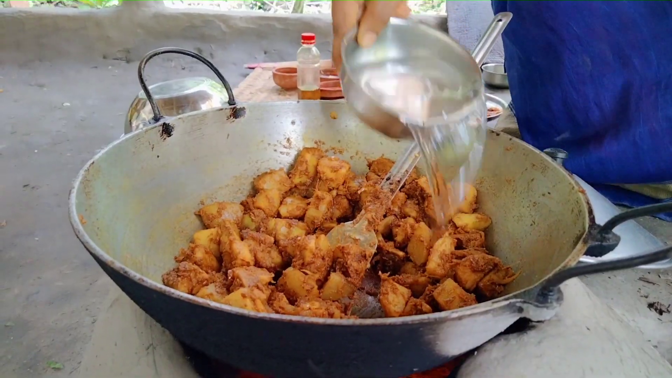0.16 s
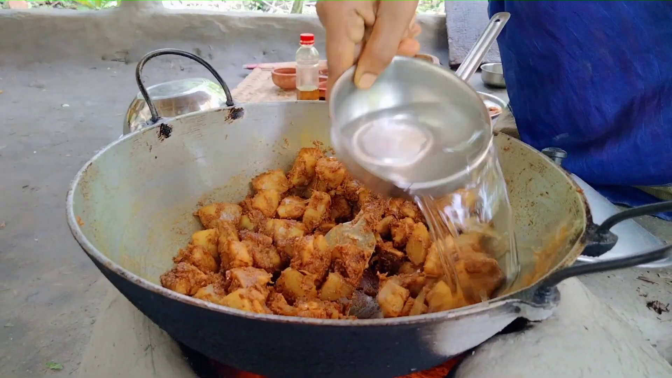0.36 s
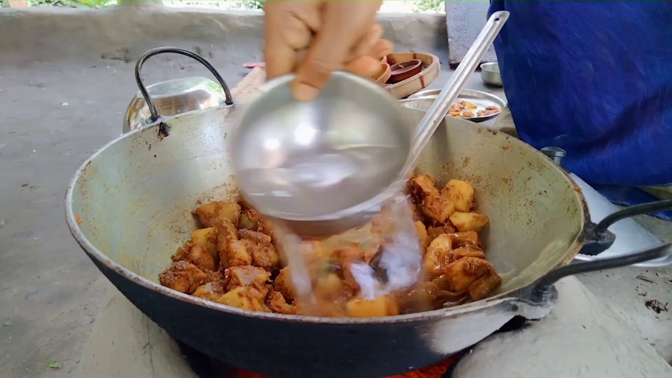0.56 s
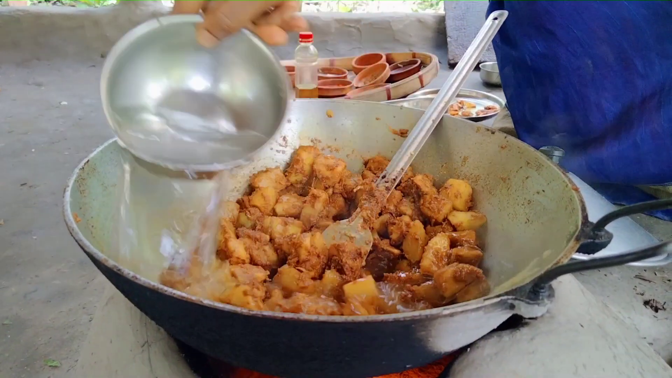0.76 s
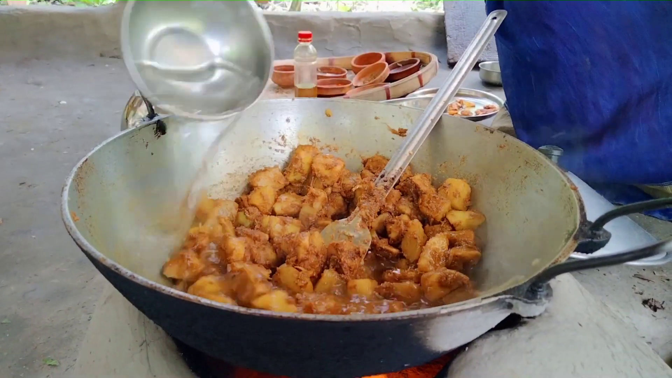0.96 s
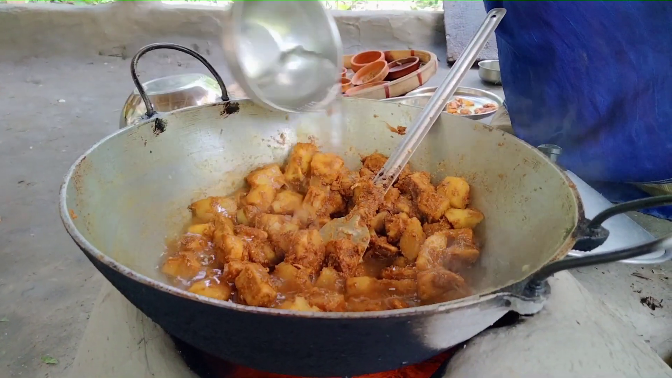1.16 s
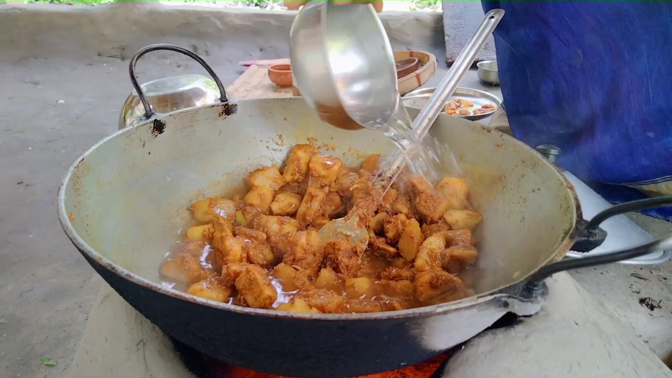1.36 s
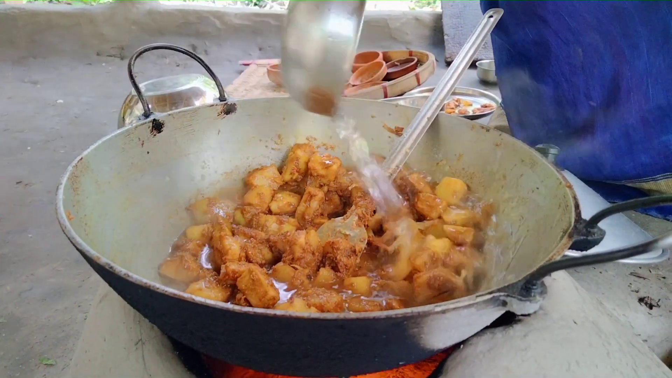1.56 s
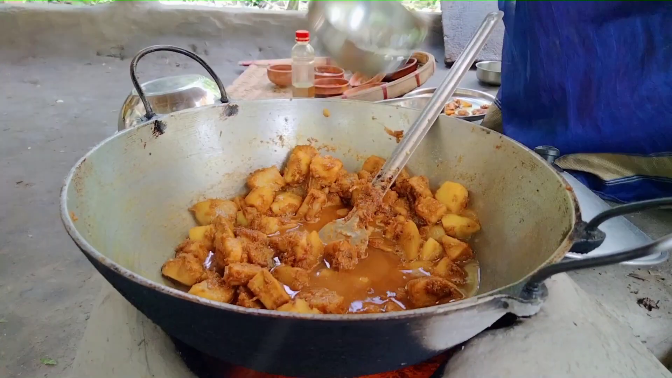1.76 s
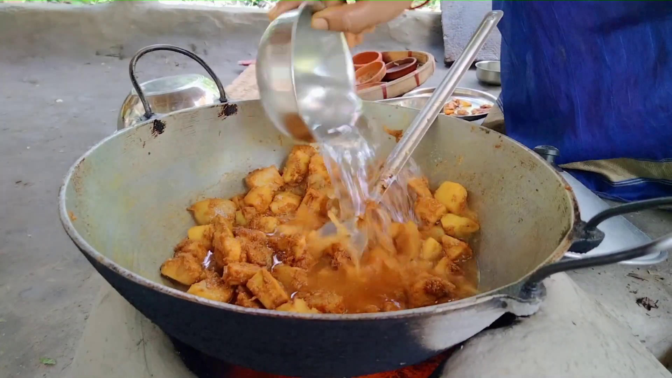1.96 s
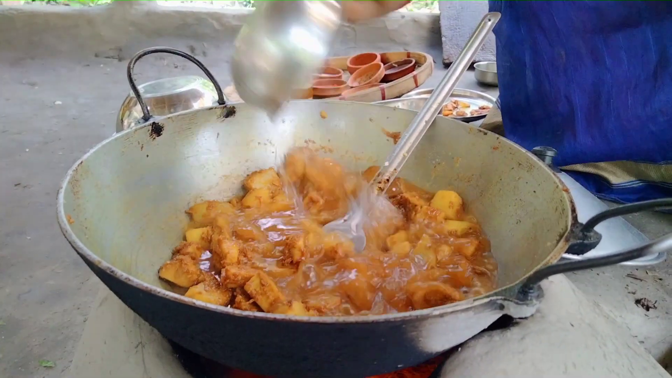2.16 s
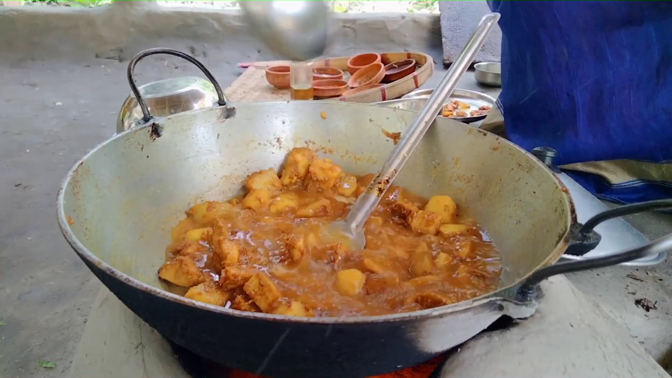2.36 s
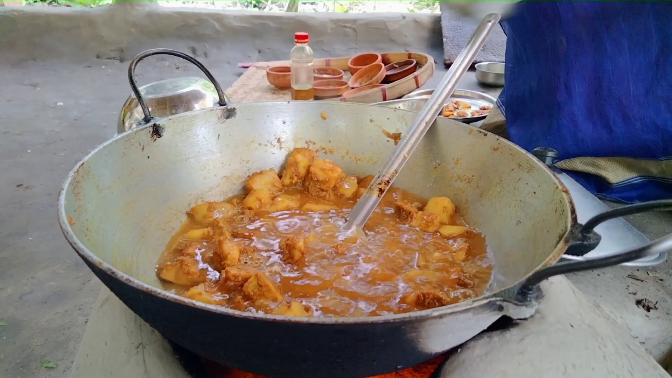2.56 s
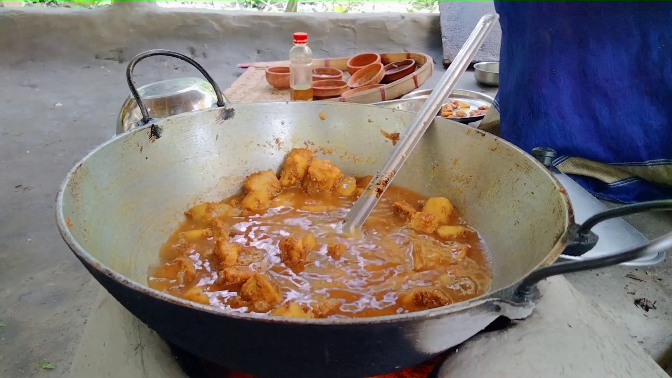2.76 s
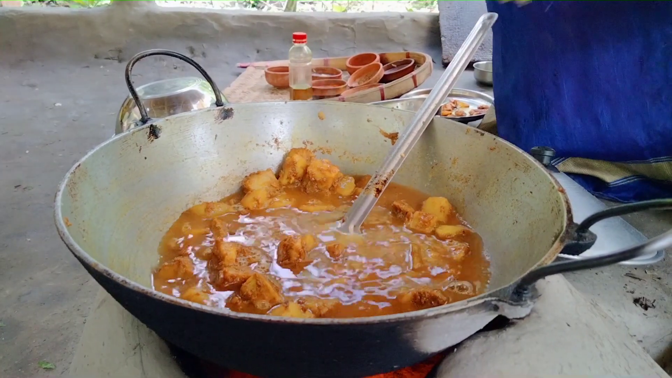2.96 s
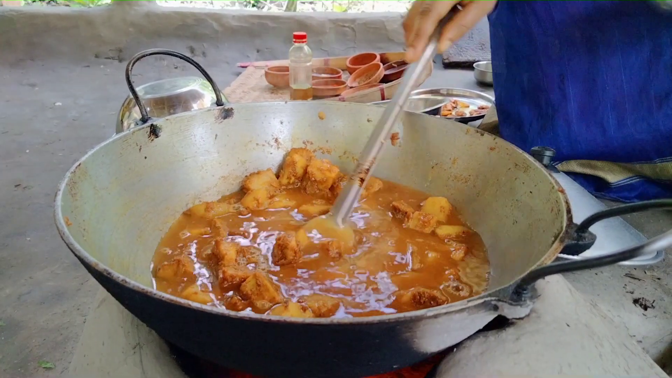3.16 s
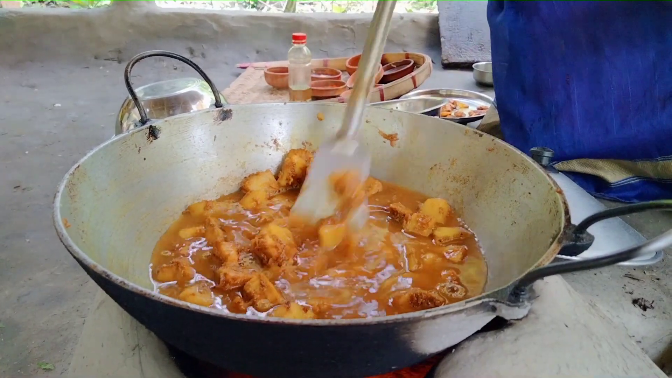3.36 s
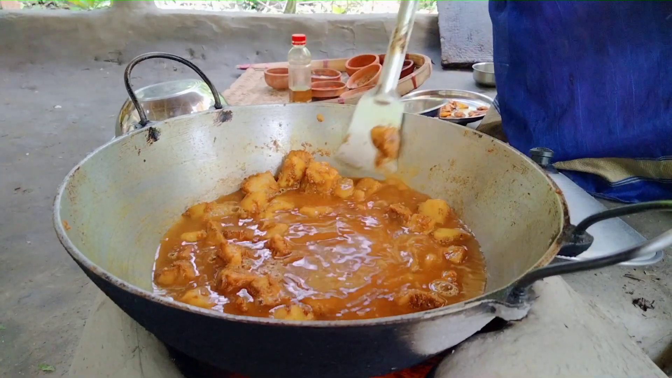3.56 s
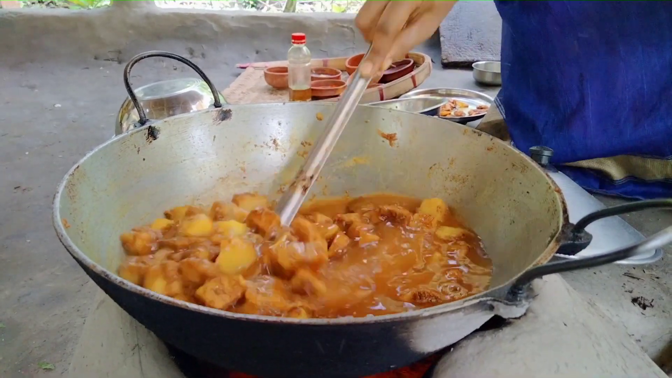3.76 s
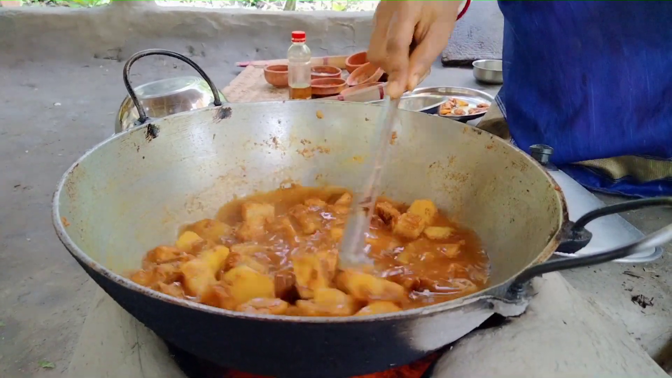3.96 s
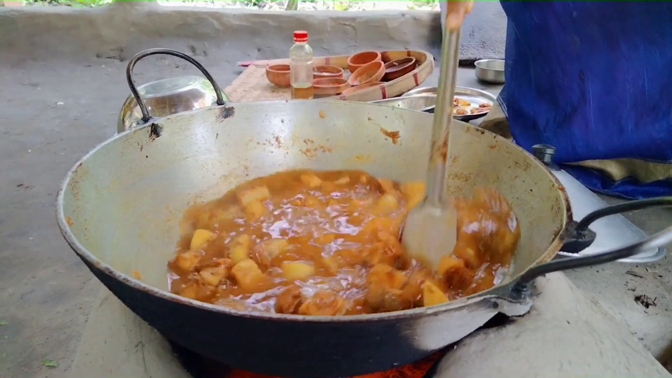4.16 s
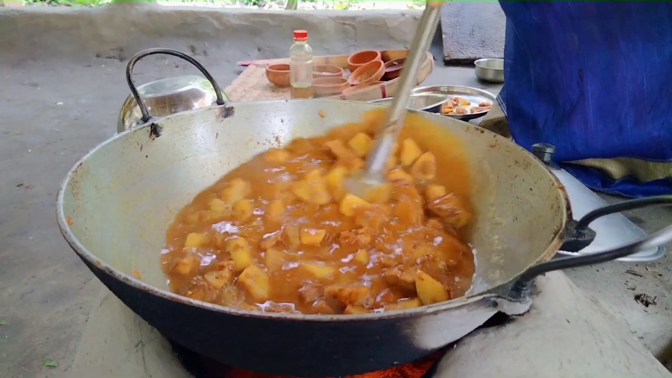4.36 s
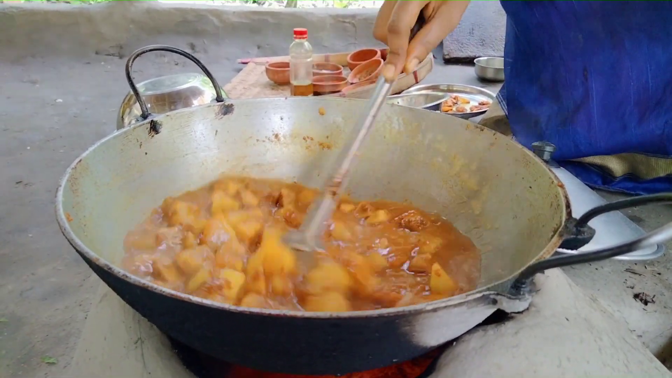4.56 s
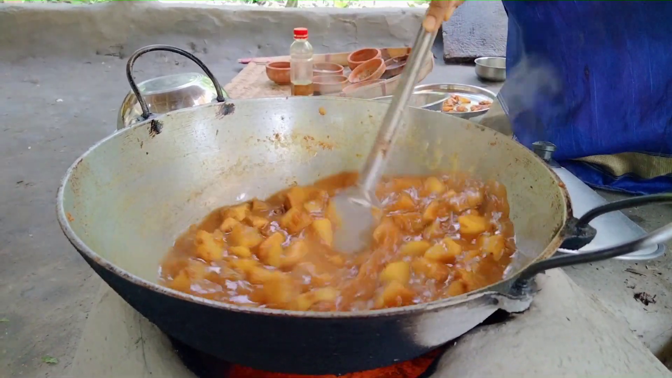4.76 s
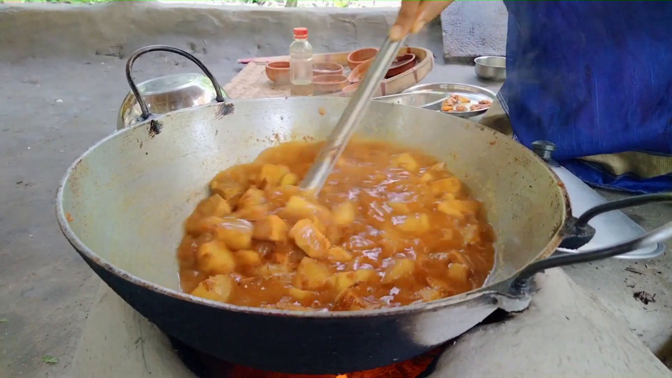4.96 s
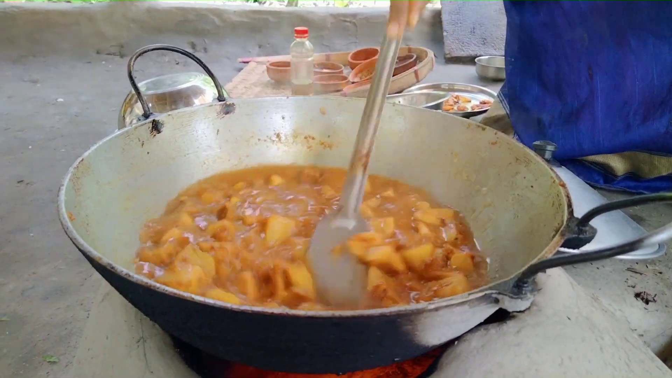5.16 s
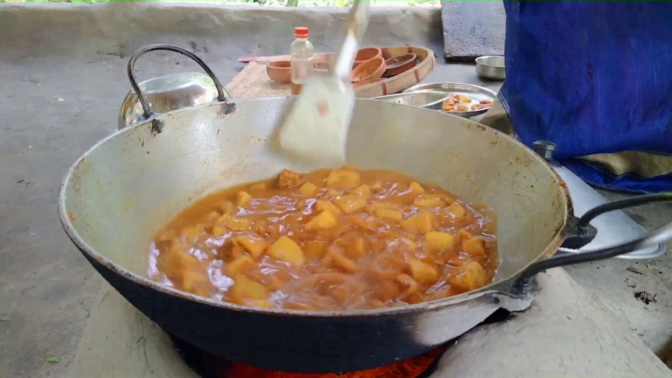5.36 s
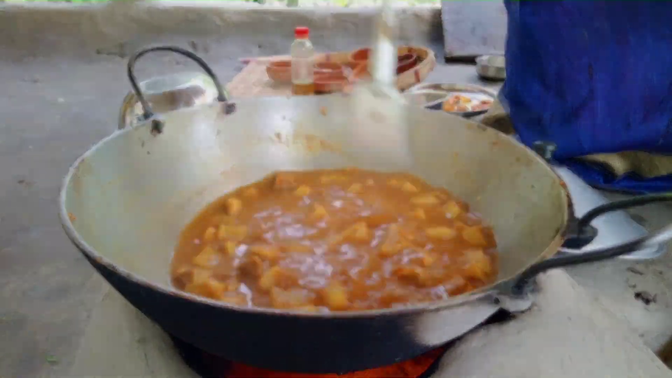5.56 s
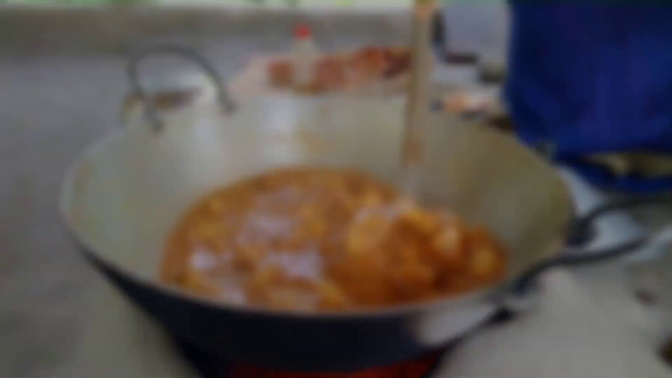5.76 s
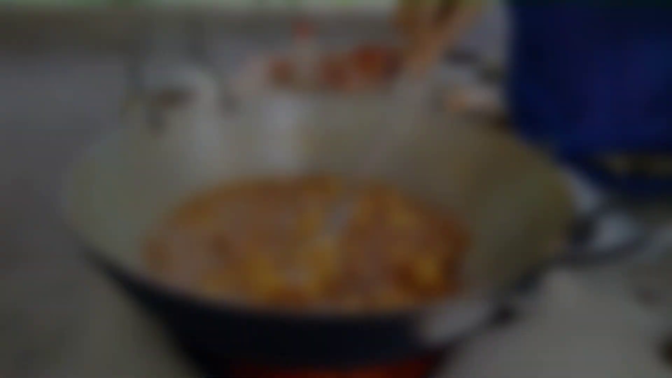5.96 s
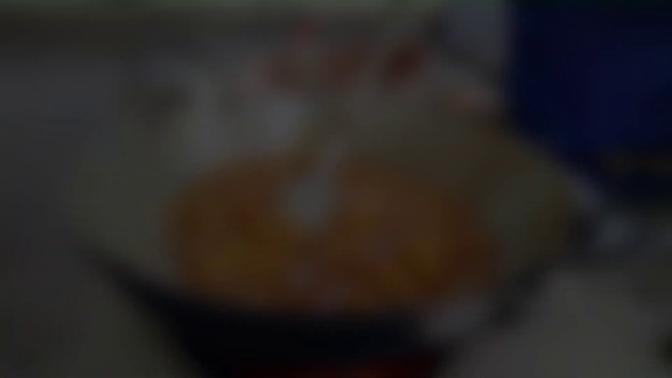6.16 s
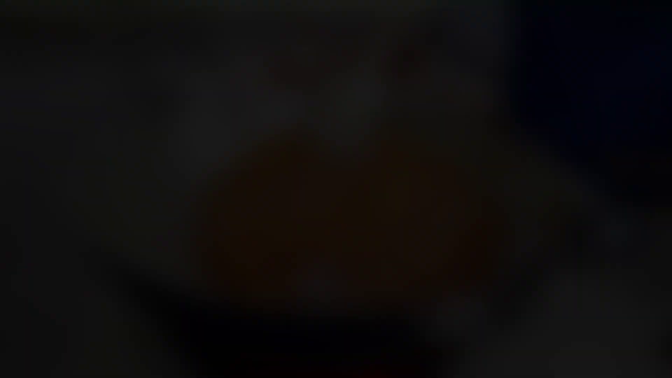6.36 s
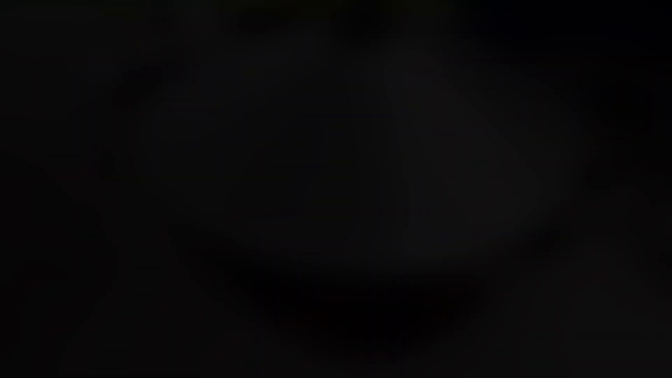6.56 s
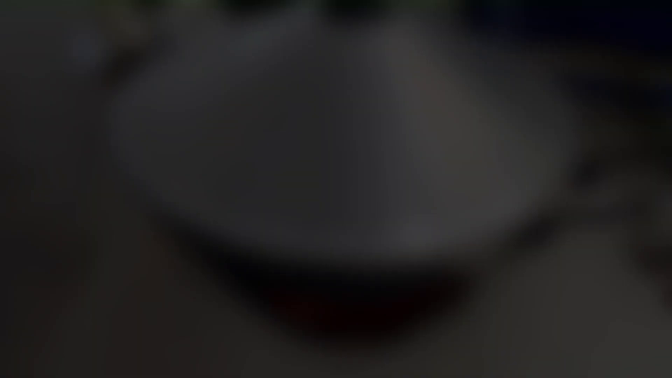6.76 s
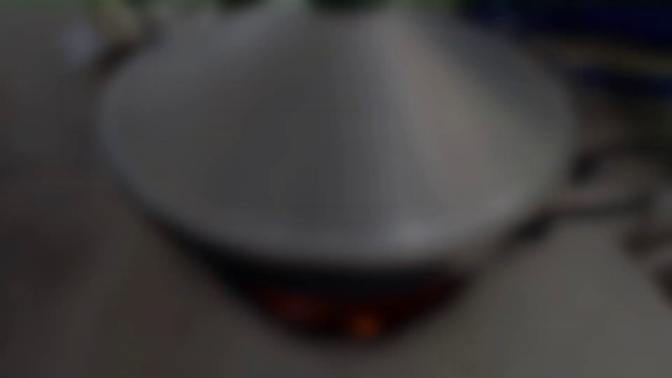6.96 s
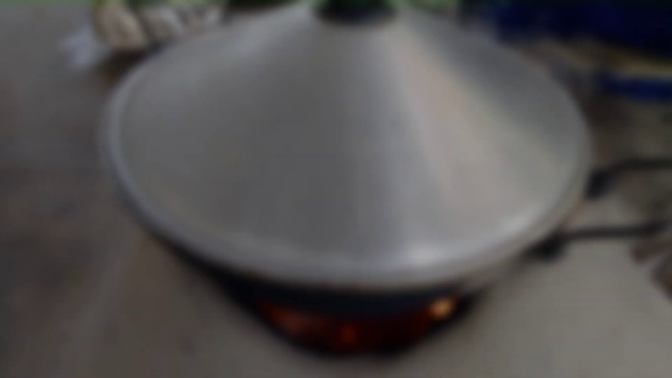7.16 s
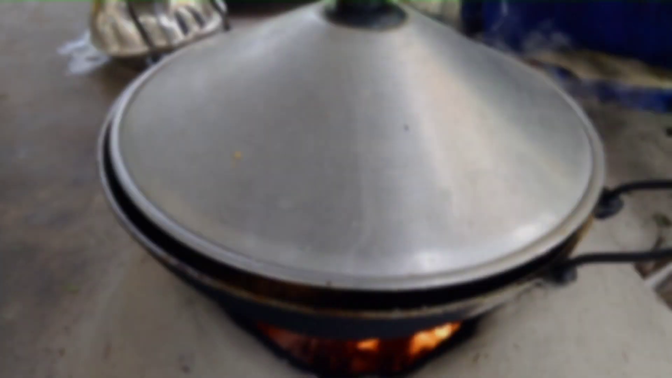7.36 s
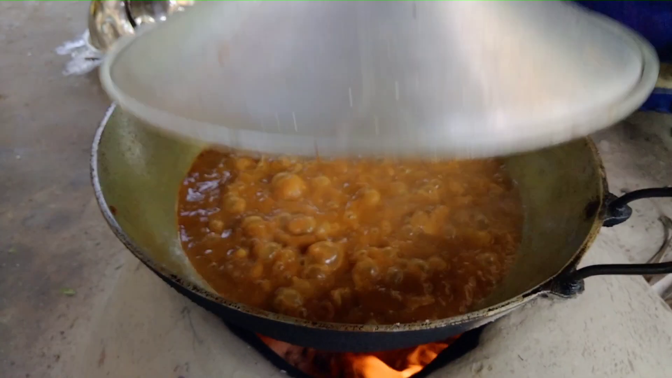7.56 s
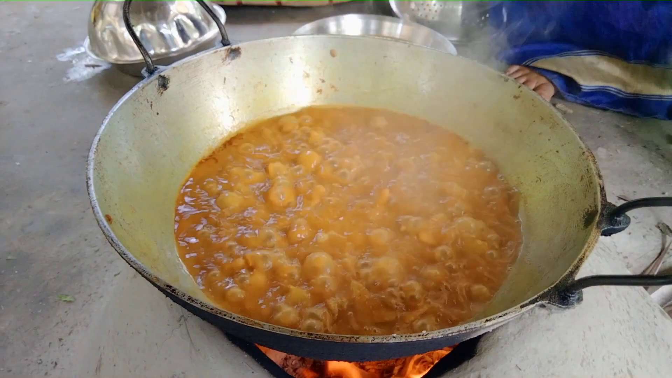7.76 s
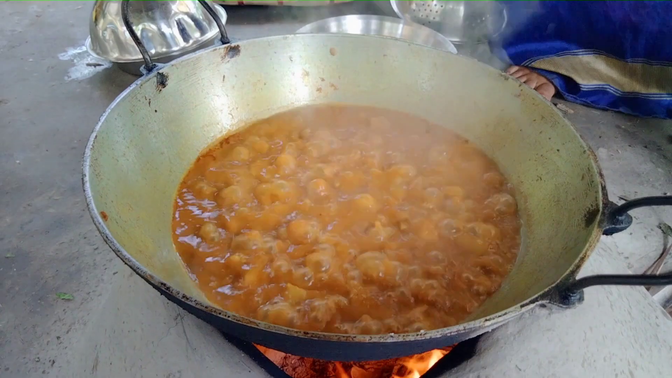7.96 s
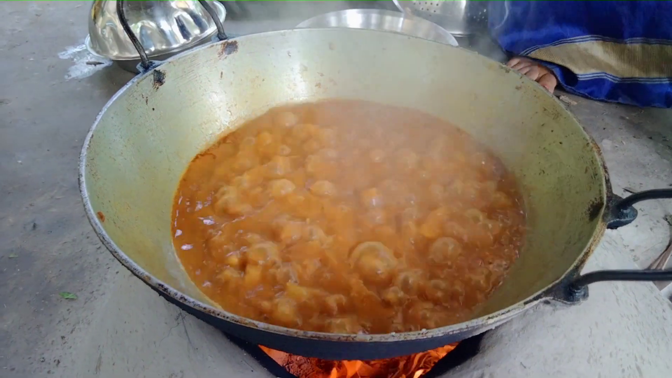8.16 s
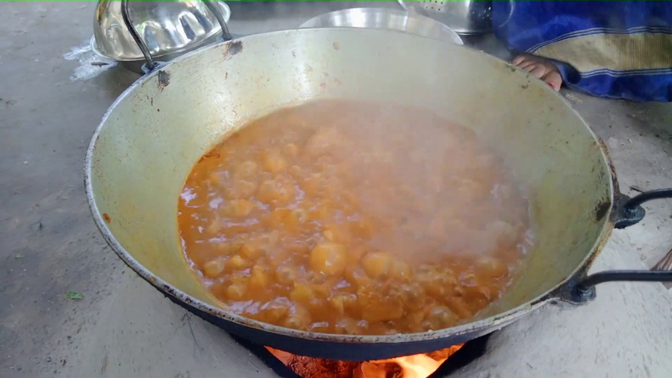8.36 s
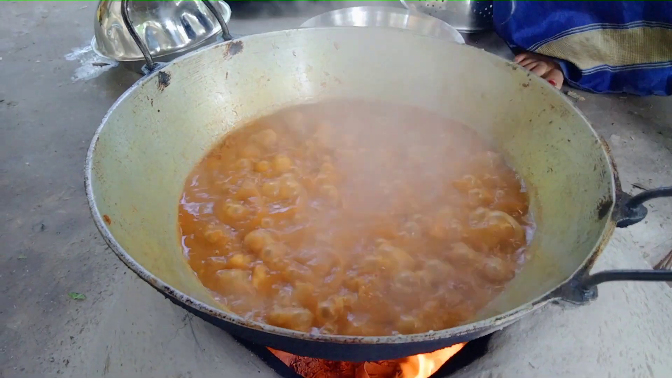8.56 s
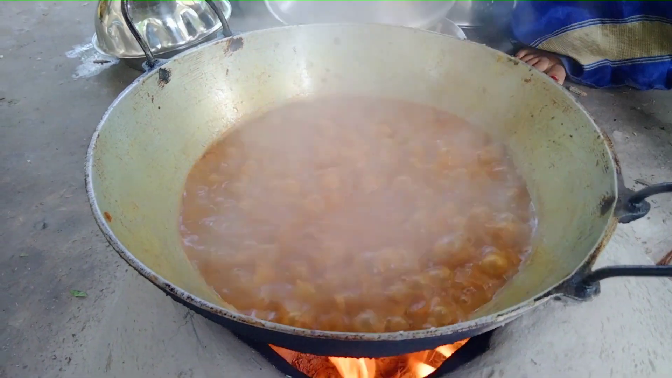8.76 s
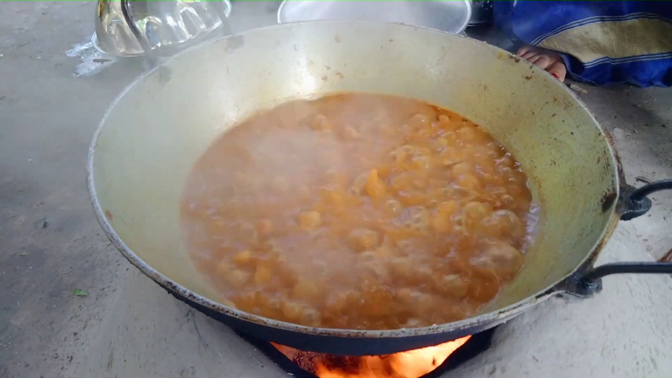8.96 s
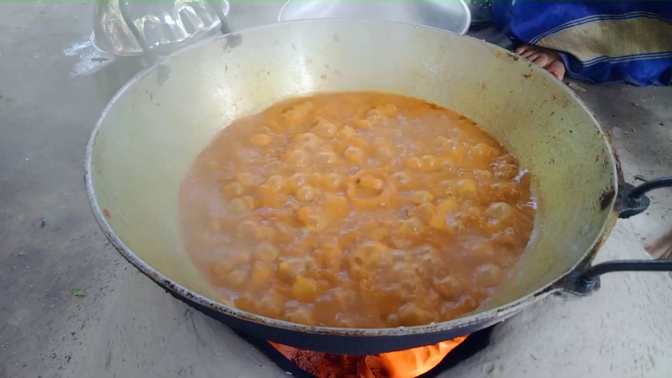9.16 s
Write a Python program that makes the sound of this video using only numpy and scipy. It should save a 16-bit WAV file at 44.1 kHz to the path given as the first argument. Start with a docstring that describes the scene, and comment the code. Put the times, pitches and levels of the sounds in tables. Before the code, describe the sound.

Water sizzles loudly in a hot pan, a metal spatula stirs, taps and scrapes, then curry bubbles quietly outdoors.

```python
"""Water flashes to steam in a hot wok of curry: countless bursts merge into a loud sizzle, coloured
by the bowl of the pan. A steel spatula squelches through the gravy, taps the pan and scrapes it,
exciting the modes of the steel. After a short silence the curry boils under a conical lid, which ticks
faintly and is lifted to let the bubbles pop in the open, each ringing as a small gas resonator. The
scene is outdoors, heard by one close microphone; a fire and gusts of wind rumble beneath the boil."""
import sys
import numpy as np
from scipy import signal
from scipy.fft import rfft, irfft, next_fast_len
from scipy.io import wavfile
from scipy.ndimage import uniform_filter1d

SR = 44100
rng = np.random.default_rng(int(sys.argv[2]) if len(sys.argv) > 2 else 0)


def transcribe(signal):
    """Save signal, clipped to [-1, 1], as a 16-bit WAV file at the path in sys.argv[1]."""
    frames = np.atleast_2d(signal).T
    limited = np.clip(frames, -1, 1)
    pcm = np.round(limited * 32767).astype(np.int16)
    wavfile.write(sys.argv[1], SR, pcm)


N = 409890
T = np.arange(N) / SR
FRY_END_S, BOIL_START_S, LID_OFF_S = 6.388, 6.569, 7.51

# Spectrum of the hiss in the bowl of the pan. Each row: frequency in Hz, level in dB.
BOWL_SPECTRUM = [(1180, -45.5), (2000, -13.5), (2180, -17.5), (3280, -1.5), (3910, 3), (4650, -8),
                 (6140, 1.5), (6700, -2.5), (7440, -12), (8190, -4.5), (9090, -3), (10600, -8.5),
                 (13800, -12), (15200, -16), (16000, -17.5)]
# Spectrum of the lower, wetter part of the hiss. Each row: frequency in Hz, level in dB.
BODY_SPECTRUM = [(88, -56), (150, -27.5), (307, -20.5), (404, -15.5), (613, -8), (920, -10), (1040, -3.5),
                 (1320, -4), (2600, -1.5), (3380, -7), (5720, -120)]
# Modes of the spatula blade. Each row: frequency in Hz, level in dB, 60 dB decay time in seconds.
BLADE_MODES = [(2659, -4, .17), (3112, -7, .6), (5400, 5, .04), (6260, 4.5, .05), (8200, 1, .04),
               (8900, 0, .03)]


def gain_of(db):
    return 10 ** (np.asarray(db) / 20)


def unit_rms(x):
    return x / np.sqrt(np.mean(x ** 2) + 1e-20)


def curves(rows):
    """Linear interpolation of each column over the times in the first."""
    times, *columns = np.transpose(rows)
    return [np.interp(T, times, column) for column in columns]


def coloured(x, spectrum):
    """Spectral shaping by (Hz, dB) points, scaled to unit RMS."""
    points_hz, points_db = np.transpose(spectrum)
    size = next_fast_len(len(x), True)
    hz = np.fft.rfftfreq(size, 1 / SR)
    db = np.interp(np.log(hz + 1), np.log(points_hz + 1), points_db)
    return unit_rms(irfft(rfft(x, size) * gain_of(db), size)[:len(x)])


def add(mix, start_s, sound):
    part = mix[round(start_s * SR):][:len(sound)]
    part += sound[:len(part)]


def resonate(x, hz, width_hz):
    """A tunable resonance by heterodyning: shift hz down to zero, smooth, and shift back."""
    carrier = np.exp(2j * np.pi * np.cumsum(hz * np.ones(len(x))) / SR)
    pole = np.exp(-np.pi * width_hz / SR)
    return 2 * (carrier * signal.lfilter([1 - pole], [1, -pole], x / carrier + 1e-18)).real


def clicks(per_s, spread_db, n=N):
    """Shot noise: random impulses of either sign, a few much larger than the rest."""
    place, size, sign = rng.random((int(per_s * n / SR) + 1, 3)).T
    heights = gain_of(spread_db * np.minimum(-np.log(1 - size), 3.6)) * np.sign(sign - .5)
    return np.bincount((place * n).astype(int), heights, n)


def flutter(ms, depth_db, n=N):
    """Random amplitude modulation on a time scale of ms milliseconds."""
    width = max(int(ms * SR / 1000), 2)
    return gain_of(depth_db * unit_rms(uniform_filter1d(rng.standard_normal(n), width)))


def swell(t, peak_s, db, rise_s, fall_s):
    """Exponential growth and decay: 20 dB up to the peak in rise_s, 20 dB down in fall_s."""
    return gain_of(db - 20 * np.maximum((peak_s - t) / rise_s, (t - peak_s) / fall_s))


def bubble(hz, t60, rise=0.077):
    """A gas cavity is a damped oscillator; its pitch climbs until it closes and the ring stops short."""
    t = np.arange(0, max(0.53 * t60, .001), 1 / SR)
    phase = 2 * np.pi * hz * (t + rise * t ** 2 / (2 * t60))
    onset = 1 - np.exp(-t * hz * 2.13)
    closing = abs(np.cos(np.pi / 2 * t / t[-1])) ** 0.6
    return np.sin(phase) * gain_of(-30 * t / t60) * onset * closing


def bubbling(per_s, low_hz, high_hz, cycles, spread_db, sizes=12):
    """Superposition of many small bubbles, each size ringing at its own random moments."""
    trains = (signal.oaconvolve(clicks(per_s / sizes, spread_db), bubble(hz, cycles / hz))[:N]
              for hz in np.geomspace(low_hz, high_hz, sizes))
    return unit_rms(sum(trains))


def sizzle():
    """Steam bursts sum incoherently to a hiss; once the lid is off, single spits stand out of it."""
    # Course of the sizzle. Each row: time in seconds, level in dB, relative dB of body and of treble.
    course = [(0.0, -38.5, -8, -4), (.06, -36.5, -7.5, -6), (0.154, -19.5, -15.5, -4), (0.35, -16, -12, -2),
              (0.9, -14.5, -10.5, -9), (1.446, -18.5, -5, -0.5), (1.741, -23.5, -3.5, 1.5),
              (1.743, -32, -3.5, -3.5), (2.3, -33, -7, -2.5), (2.76, -36.5, -6, -1.5),
              (3.21, -41.5, -3, -1), (3.5, -36.5, -6.5, -9), (3.73, -42, 3.5, -4), (3.89, -41.5, -4, -8),
              (3.95, -31.5, -6, -6.5), (4.28, -28, -2, 7.5), (4.76, -29, -5.5, -1.5),
              (5.078, -35.5, -3, 2.5), (5.25, -38, -4.5, -3), (5.4, -35.5, -8, -3), (6.126, -40.5, -6, -4),
              (6.2, -46, -6, -4), (6.45, -41, 0, -3), (6.5, -57, -5, -10), (7.13, -57.5, -7, -8),
              (7.59, -47, -6, -2.5), (7.76, -51, -30, -7), (9.29, -52.5, -22, -0.5)]
    level_db, body_db, treble_db = curves(course)
    steam = rng.standard_normal(N) + 0.21 * unit_rms(clicks(4000, 3.6))
    steam = steam * flutter(3.2, 1.1) * flutter(50, 1.0)
    spits = bubbling(1400, 2620, 15000, cycles=6.6, spread_db=4.9) * flutter(23, 2.4)
    hiss = coloured(steam + np.where(T < LID_OFF_S, .18, 2.4) * spits, BOWL_SPECTRUM)
    hiss /= np.where(T < LID_OFF_S, 1, 2.6)  # holds the power steady as the spits take over
    treble = signal.sosfiltfilt(signal.butter(3, 7500, "high", fs=SR, output="sos"), hiss)
    body = gain_of(body_db) * coloured(steam, BODY_SPECTRUM)
    return gain_of(level_db) * (unit_rms(hiss - treble) + body + gain_of(treble_db) * unit_rms(treble))


def surroundings():
    """Low-frequency noise: outdoor air while frying; fire, wind and a faint high hiss while boiling."""
    # Spectra of the three rumbles. Each point: frequency in Hz, level in dB.
    air_spectrum = [(12, -57), (20, -21), (43, -19), (141, 1), (262, -4.5), (288, -9.5), (467, -5),
                    (500, -17.5), (650, -27), (1100, -120)]
    fire_spectrum = [(35, -30), (70, -15), (120, -5.5), (178, 0.5), (240, -4), (310, -17), (500, -30),
                     (880, -120)]
    wind_spectrum = [(10, -8), (28, 7.5), (60, -5.0), (160, -3), (300, -32.5)]
    # Gusts on the microphone. Each row: peak time in seconds, level in dB, rise and fall in seconds.
    gusts = [(6.82, -46, .35, .13), (7.0, -55, .15, 0.1), (7.17, -61, .15, .09), (7.65, -54, 0.19, .16),
             (7.96, -49, 0.069, .6), (8.15, -56, .3, .2), (8.38, -49, 0.083, .06), (8.56, -53, .2, .06),
             (9.08, -65, .15, .5)]
    air = gain_of(-57) * coloured(rng.standard_normal(N), air_spectrum)
    fire = gain_of(-52.5) * coloured(rng.standard_normal(N), fire_spectrum) * flutter(40, 2.6)
    wind = coloured(rng.standard_normal(N), wind_spectrum) * flutter(25, 3.8)
    wind *= gain_of(-83) + sum(swell(T, *gust) for gust in gusts)
    hiss = gain_of(-83) * unit_rms(np.diff(rng.standard_normal(N + 1)))
    return np.where(T < BOIL_START_S, air, fire + wind + hiss)


def pop(db, hz, splat_db, cycles, snap_db, snap_s=.0001):
    """Film rupture rings a large bubble, with a snap, a rough tear, a splat and daughter bubbles."""
    t60 = cycles / hz
    ring = bubble(hz, t60)
    t = np.arange(len(ring)) / SR
    tear = resonate(rng.standard_normal(len(t)), 0.97 * hz, 0.7 * hz)
    tear = unit_rms(resonate(tear, 1.08 * hz, 1.5 * hz))
    splat = coloured(rng.standard_normal(len(t)), BOWL_SPECTRUM) * gain_of(splat_db)
    decay = gain_of(-45 * t / t60) * signal.windows.tukey(len(t), .4)
    sound = np.zeros(SR // 8)
    add(sound, 0, 1.03 * ring + (0.45 * tear + splat) * decay)
    for delay, size, pitch in rng.random((3, 3)):
        daughter = 0.29 * size * bubble(hz * (.7 + 1.6 * pitch), .5 * t60)
        add(sound, 0.36 * t60 + .025 * delay, daughter)
    u = (t - 1 / hz) / snap_s  # the snap is centred one period into the ring
    add(sound, 0, gain_of(snap_db) * (u ** 2 - 1) * np.exp(-u ** 2 / 2))
    return gain_of(db) * signal.sosfilt(signal.butter(2, 0.36 * hz, "high", fs=SR, output="sos"), sound)


def spatula_stroke(peak_s, squelch_db, hz, grate_db, rise_s, fall_s):
    """Gravy squelches in a broad resonance while friction at the edge drives the blade's damped modes."""
    t = np.arange(peak_s - 2 * rise_s, peak_s + 2 * fall_s, 1 / SR)
    slaps = clicks(4000, 2.6, len(t)) * flutter(8, 2.4, len(t))
    squelch = resonate(resonate(slaps, hz, 1100), hz, 2200)
    squelch = signal.sosfilt(signal.butter(3, 420, "high", fs=SR, output="sos"), squelch)
    grit = clicks(2200, 1.4, len(t)) * flutter(8.2, 3.1, len(t))
    ring_t = np.arange(0, .012, 1 / SR)
    blade_ring = sum(gain_of(mode_db - 60 * ring_t / .009) * np.sin(2 * np.pi * mode_hz * ring_t)
                     for mode_hz, mode_db, _ in BLADE_MODES)
    steel = signal.oaconvolve(grit, blade_ring)[:len(t)]
    grate = coloured(grit, BOWL_SPECTRUM) + .6 * unit_rms(steel)
    sound = gain_of(squelch_db) * unit_rms(squelch) + gain_of(grate_db) * grate
    return t[0], sound * swell(t, peak_s, 0, rise_s, fall_s)


def metal_impact(db, pan_db, blade_db, rim_db, crack_t60):
    """An impact gives a broadband crack, then free modal vibration, very faint for a tick of the lid."""
    # Modes of the pan and its rim. Each row: frequency in Hz, level in dB, 60 dB decay time in seconds.
    pan_modes = [(382, -5, 0.17), (526, -18, 0.097), (605, -14, .15), (839, -11.5, 0.13),
                 (1086, -11.5, 0.15), (1540, -12, 0.21), (1770, -26, 0.09), (2000, -8.5, 0.15)]
    rim_modes = [(2477, 2, 0.075), (3290, -5, 0.22), (3920, -16.5, 0.09), (4000, -1, 0.11),
                 (4500, -1.5, .05)]
    t = np.arange(SR // 4) / SR
    crack = coloured(rng.standard_normal(len(t)), BOWL_SPECTRUM)
    crack += 0.16 * coloured(rng.standard_normal(len(t)), BODY_SPECTRUM)
    crack *= gain_of(-60 * t / crack_t60) + 3.2 * gain_of(-60 * t / 0.015)
    parts = (pan_db, pan_modes), (blade_db, BLADE_MODES), (rim_db, rim_modes)
    ring = sum(gain_of(part_db + mode_db - 60 * t / t60) * np.sin(2 * np.pi * (hz * t + rng.random()))
               for part_db, modes in parts for hz, mode_db, t60 in modes)
    damping = np.clip((.11 - t) / .03, 0, 1)  # the gravy soon stifles the steel
    onset = 1 - np.exp(-t / 0.00041)
    return gain_of(db) * (0.67 * crack + 3.0 * ring * damping) * onset


def singing_edge():
    """Friction at the dragged edge of the spatula feeds one narrow resonance."""
    # Swells of the tone. Each row: peak time in seconds, level in dB, rise and fall in seconds.
    drags = [(5.5, -34, .03, 0.11), (5.622, -39, 0.055, .02), (5.832, -29, 0.067, .02),
             (5.88, -36, .05, 0.11)]
    level = sum(swell(T, *drag) for drag in drags)
    return level * unit_rms(resonate(rng.standard_normal(N), hz=1707, width_hz=40))


def boil():
    """Rolling bubbles force the lid's modes and the cavity resonance under it, until it is lifted."""
    # Course of the boil. Each row: time in seconds, level in dB, cavity pitch in Hz, lid ring in dB.
    course = [(6.57, -41.5, 301, -51), (7.03, -46.5, 305, -53), (7.09, -48, 300, -46),
              (7.14, -38, 300, -43), (7.2, -44, 326, -52.5), (7.25, -39, 380, -54), (7.34, -38, 456, -49),
              (7.75, -39, 574, -36), (9.29, -39.5, 630, -46)]
    # Modes of the lid. Each row: frequency in Hz, bandwidth in Hz, level in dB.
    lid_modes = [(1050, 46, -2.5), (1620, 41, -8), (2124, 43, -9.5)]
    level_db, cavity_hz, lid_db = curves(course)
    covered = 1 / (1 + np.exp((T - LID_OFF_S) / 0.076))
    small = bubbling(1200, 663, 3150, cycles=5.9, spread_db=2.9) * flutter(25, 3.8)
    roll = bubbling(1500, 355, 1080, cycles=4.25, spread_db=5.0)
    cavity = unit_rms(resonate(resonate(roll, cavity_hz, 118), cavity_hz, 240))
    lid = unit_rms(sum(gain_of(db) * resonate(small, hz, width) for hz, width, db in lid_modes))
    direct = (.6 - 0.11 * covered) * roll + 0.5 * (1 - covered) * small
    bubbles = gain_of(level_db) * flutter(120, 1.9) * (direct + 0.36 * covered * cavity)
    return bubbles + gain_of(lid_db) * flutter(30, 3.8) * covered * lid


def middling_pops(count=18, low_hz=626, high_hz=1700, splat_db=-7):
    """Rows for middling bubbles of the open boil, uniformly distributed in time and log frequency."""
    when, size, pitch = rng.random((count, 3)).T
    starts = LID_OFF_S + when * (T[-1] - LID_OFF_S)
    pitches = low_hz * (high_hz / low_hz) ** pitch
    return [(start_s, db, hz, splat_db) for start_s, db, hz in zip(starts, -32.5 + 11 * size, pitches)]


def scene():
    """Superposition of the sources: frying, then boiling, with sizzle and surroundings under both."""
    # Pushes through the gravy. Each row: peak time in seconds, squelch level in dB, its centre in Hz,
    # grating level in dB, rise and fall in seconds.
    strokes = [(1.824, -22, 2250, -38, 0.0054, .016), (1.896, -32, 1950, -34, 0.036, 0.15),
               (2.15, -32, 1960, -31, 0.021, 0.031), (3.2, -47, 3500, -34, 0.0062, 0.084),
               (3.42, -40, 2330, -33, 0.04, 0.22), (3.508, -23.5, 1460, -50, 0.086, 0.14),
               (3.766, -29, 1830, -48, 0.044, .035), (3.859, -37, 2000, -48, 0.1, 0.078),
               (5.381, -46, 3400, -31, 0.043, 0.083), (5.43, -37, 2800, -27, .05, 0.055),
               (5.48, -27.5, 2900, -30, 0.065, 0.14), (5.525, -29.5, 646, -46, .06, 0.074),
               (5.52, -28, 1420, -33.5, 0.06, 0.048), (5.616, -37, 1830, -34.5, 0.037, 0.13),
               (5.83, -34.5, 1600, -49, 0.38, 0.012), (5.978, -36.5, 1850, -36, .14, 0.05)]
    # Spatula blows on the pan, then faint ticks of the lid during the boil. Each row: start in seconds,
    # level in dB, relative dB of pan, blade and rim modes, 60 dB decay of the crack's tail in seconds.
    impacts = [(2.792, -31.5, -32, -25, -20, .035), (2.8549, -27, -11, -17, -9, 0.039),
               (2.8672, -30, -12, -14, -20, .035), (3.3234, -14, -22, -15, -38, 0.0099),
               (3.3275, -19, -22, -11, -28, 0.04), (3.429, -29.5, -22, -14, -24, .03),
               (5.3307, -15.5, -28, -41, -21, 0.026), (5.3429, -17.5, -20.5, -18, -32, 0.038),
               (6.33, -19, -38, -30, -20, 0.031), (6.3367, -10.5, -22, -21, -17.5, 0.1),
               (6.6886, -36.5, -36, -33, -29, 0.024), (6.772, -40.5, -35, -35, -35, 0.053),
               (7.7186, -32, -35, -35, -30, .03), (7.7254, -35, -35, -35, -30, 0.041)]
    # Plops of water and stirred gravy, then the largest bubbles of the boil.
    # Each row: start in seconds, level in dB, pitch in Hz, relative dB of the splat.
    large_pops = [(.685, -28.5, 307, -40), (.709, -33, 294, -40), (.739, -37, 238, -40),
                  (0.898, -35, 377, -40), (1.825, -20, 1103, -40), (1.825, -3.5, 2250, -27),
                  (1.842, -20, 3300, -12.5), (1.892, -20.5, 1410, -11), (1.904, -16, 2460, -13),
                  (1.924, -11, 2940, -20), (1.938, -24, 1810, -15), (1.965, -19, 4000, -9),
                  (1.965, -28, 840, -40), (2.132, -16.5, 2750, -17), (2.149, -10.5, 3940, -15),
                  (2.159, -25, 855, -40), (2.16, -16, 2460, -11), (3.449, -19, 2820, -14.5),
                  (3.468, -17, 2690, -12), (3.494, -15, 1640, -20.5), (3.502, -11, 1760, -32),
                  (3.511, -17, 1870, -25.5), (3.517, -19, 1020, -25.5), (3.526, -17, 1060, -28),
                  (3.532, -19.5, 684, -23.5), (3.562, -15.5, 1400, -32), (3.605, -20, 3870, -6),
                  (3.628, -27, 1090, -13), (3.692, -22, 3500, -8), (3.708, -19, 1100, -23),
                  (3.735, -17.5, 3600, -8), (3.742, -24.5, 1040, -25), (3.765, -16, 2250, -13),
                  (3.784, -23, 1750, -26), (3.805, -13, 1390, -27), (3.828, -16, 2500, -24),
                  (3.833, -16, 3030, -24), (3.88, -16, 2440, -9), (3.906, -25, 1165, -17),
                  (3.998, -20.5, 1730, -4), (4.082, -14.5, 2960, -5), (4.255, -14.5, 2070, -13),
                  (4.932, -11, 3720, -20), (5.43, -44, 190, -40), (5.54, -39, 190, -40),
                  (5.672, -20, 2670, -1), (5.68, -18.5, 1430, -18), (5.689, -28, 2500, -9),
                  (5.764, -23, 2400, -15), (5.829, -21.5, 1080, -40), (5.827, -17, 1620, -23),
                  (5.856, -16.5, 2970, -20), (5.911, -20, 2970, -20), (6.256, -46, 322, -40),
                  (6.886, -32, 327, -22), (7.315, -31, 1110, -14), (7.481, -26.5, 1340, -8),
                  (7.556, -24, 1130, -16), (7.66, -22, 1410, -12), (7.685, -24, 1200, -12),
                  (7.701, -19.5, 1300, -18), (7.718, -19, 3360, -13), (7.744, -26, 1200, -12),
                  (7.75, -20.5, 1720, -20), (7.7615, -23, 1280, -20), (7.761, -19.5, 2880, -22),
                  (7.791, -26, 1110, -22), (7.881, -25, 900, -17), (7.903, -26, 1330, -15),
                  (7.916, -22, 1290, -13), (8.004, -24, 1150, -11), (8.053, -23, 1480, -22),
                  (8.085, -28, 1280, -16), (8.14, -28, 1190, -21), (8.191, -25, 1140, -24),
                  (8.204, -23, 1560, -18), (8.236, -19.5, 1115, -22), (8.266, -23.5, 1200, -20),
                  (8.414, -21.5, 1070, -25), (8.492, -27, 1160, -25), (8.51, -24, 1680, -13),
                  (8.532, -24, 1620, -5.5), (8.613, -27, 1200, -23), (8.665, -25, 1090, -22),
                  (8.689, -21, 1290, -15), (8.695, -20, 1890, -18), (8.712, -25, 1750, -20),
                  (8.727, -29, 644, -15), (8.751, -26, 1290, -15), (8.787, -27, 790, -22),
                  (8.821, -26, 1180, -19), (8.837, -29, 1880, -16), (8.866, -29, 695, -22),
                  (8.911, -31, 1240, -4), (9.0, -25, 1090, -11), (9.02, -28, 1770, -16),
                  (9.075, -26.5, 810, -16), (9.107, -19.5, 1040, -20), (9.178, -21, 1900, -18),
                  (9.19, -32, 915, -18), (9.227, -24, 840, -14)]
    frying, boiling = singing_edge(), boil()
    for stroke in strokes:
        add(frying, *spatula_stroke(*stroke))
    for start_s, *impact in impacts:
        add(frying if start_s < FRY_END_S else boiling, start_s, metal_impact(*impact))
    for start_s, db, hz, splat_db in large_pops + middling_pops():
        if start_s < FRY_END_S:
            add(frying, start_s, pop(db, hz, splat_db, cycles=26, snap_db=-7))
        else:
            add(boiling, start_s, pop(db, hz, splat_db, cycles=18.5, snap_db=-8))
    mix = np.where(T < BOIL_START_S, frying, boiling) + sizzle() + surroundings()
    return np.array([mix, mix])


def record(dry):
    """A gate puts silence between frying and boiling; soft saturation and a low-pass filter follow."""
    # Band edges where the treble steps down, then ends. Each entry: frequency in Hz.
    edges_hz = [0, 15500, 15750, 16700, 16850, SR / 2]
    gate = np.interp(T, [FRY_END_S - .002, FRY_END_S, BOIL_START_S, BOIL_START_S + 0.0038], [1, 0, 0, 1])
    low_pass = signal.firwin2(1023, edges_hz, [1, 1, .06, .02, 0, 0], window=("kaiser", 9), fs=SR)
    return signal.oaconvolve(np.tanh(dry * gate), low_pass[None], "same")


dry = scene()
out = record(dry)
transcribe(out)
```